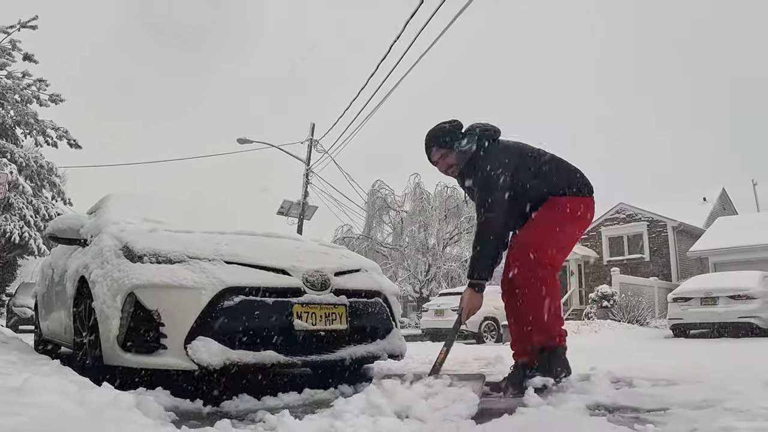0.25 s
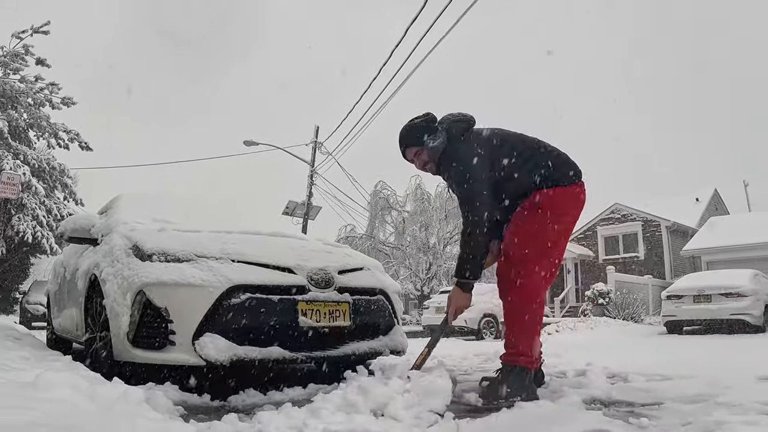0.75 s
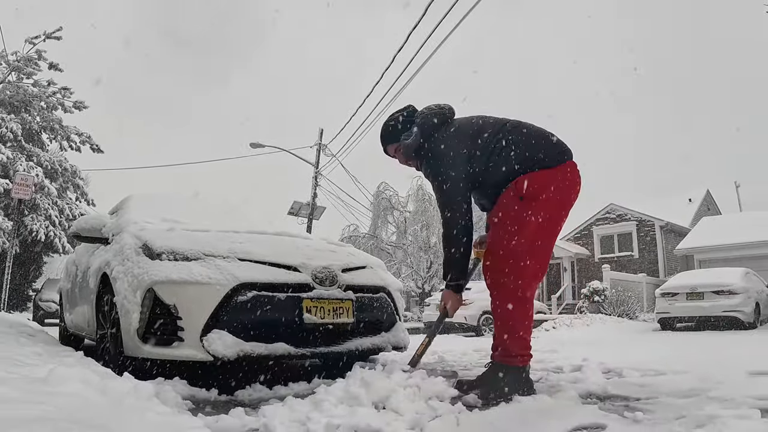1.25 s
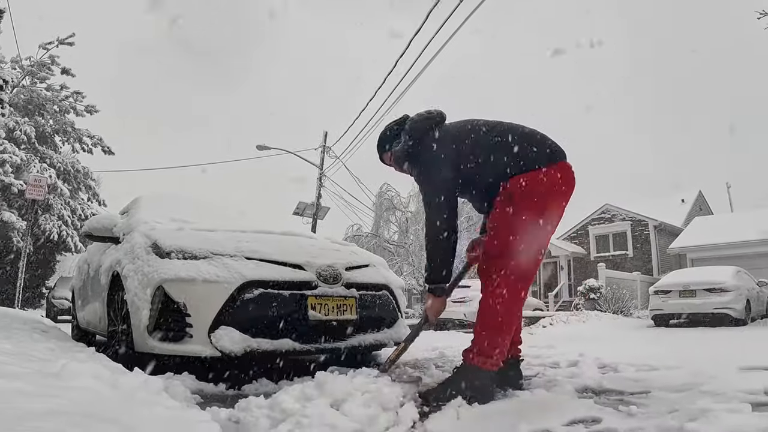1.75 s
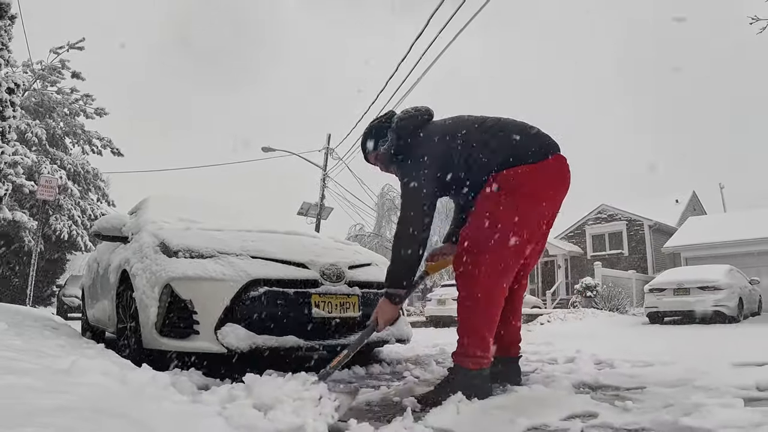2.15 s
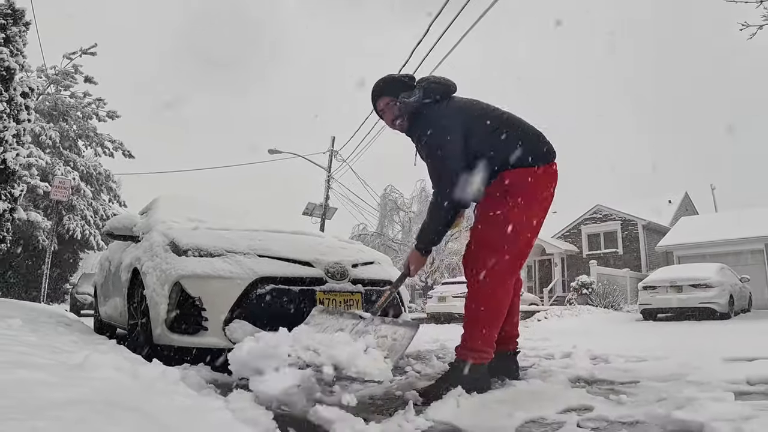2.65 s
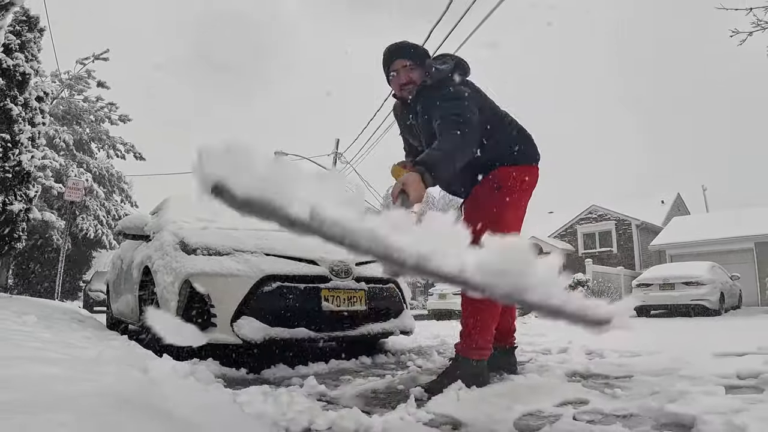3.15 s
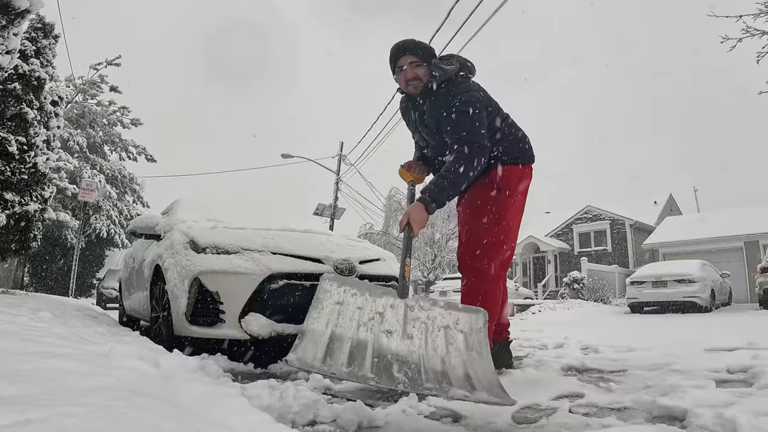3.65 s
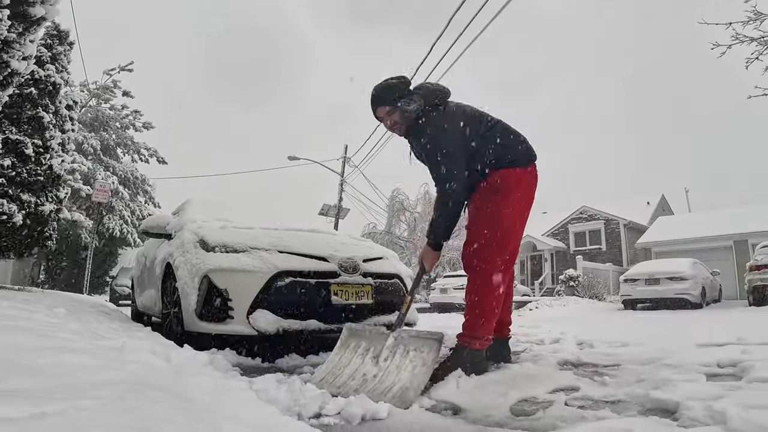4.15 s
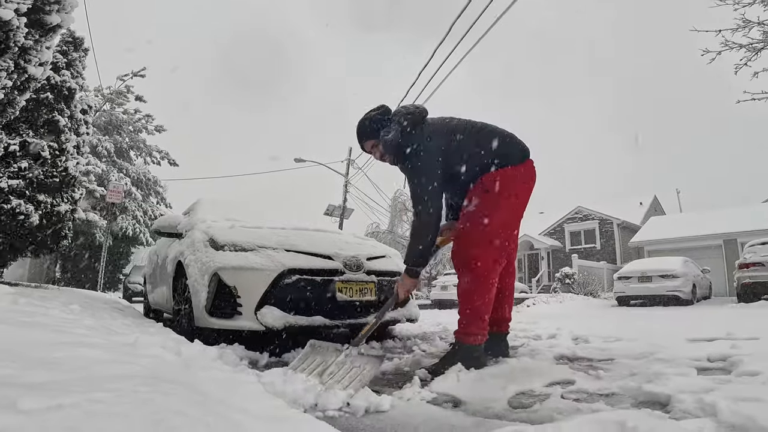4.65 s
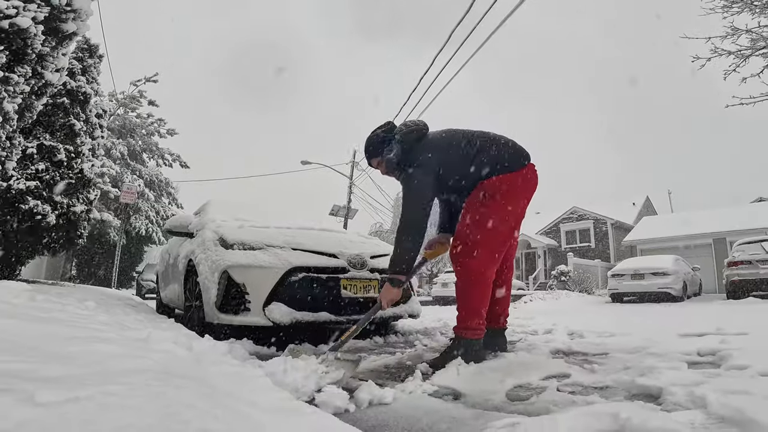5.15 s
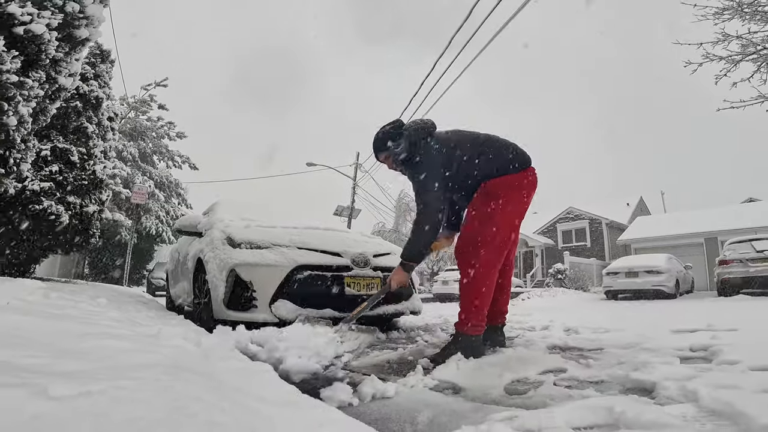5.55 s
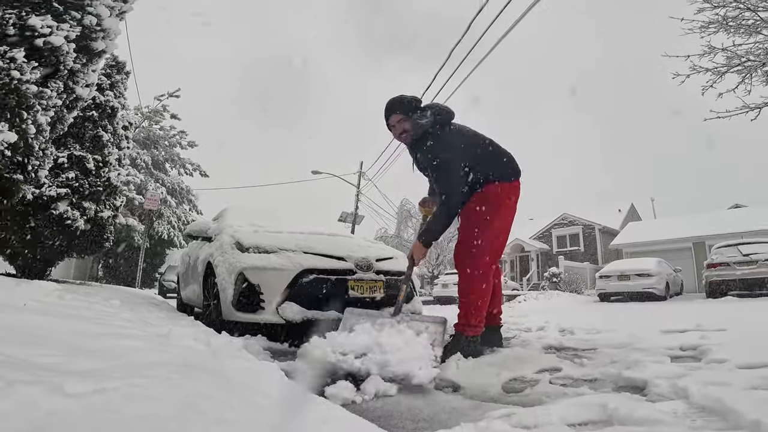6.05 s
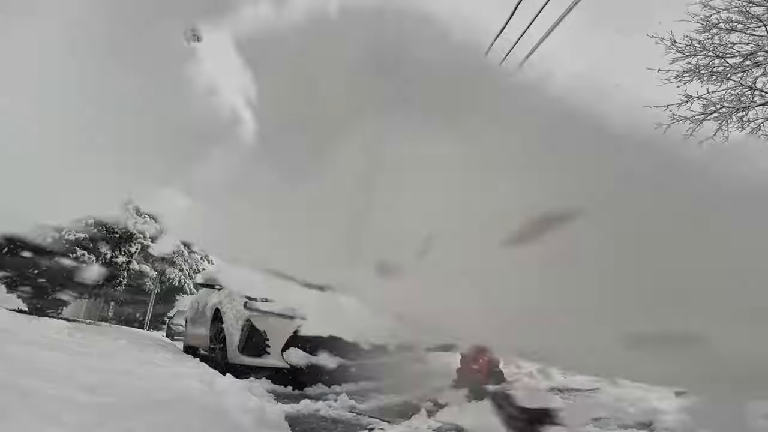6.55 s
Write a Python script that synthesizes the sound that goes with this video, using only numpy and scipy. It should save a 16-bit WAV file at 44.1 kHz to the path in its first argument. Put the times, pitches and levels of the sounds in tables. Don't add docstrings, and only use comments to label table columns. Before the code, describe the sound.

Outdoor stereo microphone a few steps from a snow shovel. Hollow, low-mid scraping stutters with grit clicks and dull knocks, in irregular bursts separated by light drags and near-quiet. Airy snow hisses swell and cut off after the loaded push; a later icy scrape is the loudest and crispest. Distant low traffic and a muffled tyre hiss lie underneath. Snow lands on the microphone at the end, thudding and crackling.

```python
import sys
import numpy as np
from scipy import signal
from scipy.fft import rfft, irfft, next_fast_len
from scipy.io import wavfile
from scipy.ndimage import uniform_filter1d, map_coordinates

SR = 44100
rng = np.random.default_rng(int(sys.argv[2]) if len(sys.argv) > 2 else 0)


def store_pcm(level_fs):
    pcm = np.round(np.clip(level_fs, -1, 1) * 32767).astype(np.int16)
    wavfile.write(sys.argv[1], SR, np.atleast_2d(pcm).T)


def natural_amplitude(level_db):
    exponent = np.asarray(level_db, float) / 20
    return 10 ** exponent


N = 299880


def unit(x):
    return x / np.sqrt(np.mean(x ** 2) + 1e-20)


def even(gate):
    return gate / np.sqrt(np.abs(uniform_filter1d(gate ** 2, size=3000)) + 1e-9)


def along(points, hz):
    f, value = np.transpose(points)
    return np.interp(np.log(hz + 1), np.log(f + 1), value)


def curves(rows):
    s, *columns = np.transpose(rows)
    return [np.interp(np.arange(N) / SR, s, column) for column in columns]


def wobble(rate):
    knots = rng.standard_normal(int(N * rate / SR) + 4)
    return map_coordinates(knots, [np.arange(N) * rate / SR])


def filtered(x, response):
    m = next_fast_len(x.shape[-1] + 8192)
    return irfft(rfft(x, m) * response(np.fft.rfftfreq(m, 1 / SR)), m)[..., :x.shape[-1]]


def modes(table):
    def response(f):
        total = 0
        for k, (centre, width, db) in enumerate(table):
            resonance = 1j * f * width / (centre * centre - f * f + 1j * f * width)
            total = total + (-1) ** k * natural_amplitude(db) * resonance
        return total
    return response


def spread(pair, alike):
    def mid_side(hz):
        turn = np.arccos(np.clip(along(alike, hz), -1, 1)) / 2
        return np.array([np.cos(turn), np.sin(turn)])
    mid, side = filtered(pair, mid_side)
    return np.array([mid + side, mid - side])


def panned(pair, lr_db):
    return pair * natural_amplitude([[lr_db / 2], [-lr_db / 2]])


def rush(spectrum, grain=1, patchy_db=1):
    z = signal.stft(grain * rng.standard_normal((2, N)), nperseg=256)[2]
    field = uniform_filter1d(rng.standard_normal(z.shape[1:]), size=7, axis=0)
    field = uniform_filter1d(field, size=5, axis=1)
    pair = signal.istft(z * natural_amplitude(patchy_db * unit(field)), nperseg=256)[1][:, :N]
    return unit(filtered(pair, lambda hz: natural_amplitude(along(spectrum + [(20000, -120)], hz))))


def slips(rate, scatter_db, life_s):
    scatter = np.clip(rng.standard_normal(N), -2, 2)
    starts = (rng.random(N) < rate / SR) * natural_amplitude(scatter_db * scatter)
    slow, fast = np.exp(-1 / (life_s * SR)), np.exp(-3 / (life_s * SR))
    return unit(signal.lfilter([1], np.convolve([1, -slow], [1, -fast]), starts))


# (frequency [Hz], width [Hz], level [dB])
BLADE_MODES = [(121, 27, -11.5), (180, 22, -5), (296, 62.5, -4), (388, 119, 1.5), (418, 172, -3)]
# (frequency [Hz], width [Hz], level [dB])
RIB_MODES = [(532, 148, 4), (792, 218, 5.5), (870, 197, 5), (1510, 700, -7)]
# (frequency [Hz], density [dB per Hz])
SLUSH_SPECTRUM = [(400, -42), (700, -8), (1100, 3.5), (1600, 2.5), (3200, 4.5), (5000, -4), (7500, -12.5),
                  (11000, -50)]
# (frequency [Hz], density [dB per Hz])
POWDER_SPECTRUM = [(2500, -20), (4500, -4.5), (7500, -7.5), (10000, -9), (12500, -15.5), (15000, -14)]
# (frequency [Hz], left-right likeness [0..1])
NEAR = [(30, .95), (130, .97), (500, .975), (1500, .97), (3000, .95), (6000, .9), (10000, .78), (13500, .2)]


def shovel():
    shake_db, ribs_db, slush_db, powder_db = motion()
    contact = np.clip((shake_db - slush_db) / 12, 0, 1) * np.clip((shake_db + 56) / 12, .15, 1)
    grit = slips(rate=320, scatter_db=5, life_s=.0022)
    fine_grit = slips(rate=600, scatter_db=4, life_s=.001)
    grain = even(1 + contact * grit + .15 * fine_grit)
    grain = grain * even(natural_amplitude(2.2 * contact * wobble(55)))

    force = even(1.2 + grit) * rng.standard_normal((2, N))
    bending = unit(filtered(force, lambda f: modes(BLADE_MODES)(f) / (1 + (f / 600) ** 4)))
    ribs = unit(filtered(force, lambda f: modes(RIB_MODES)(f) / (1 + (400 / (f + 1)) ** 4)))
    slush = natural_amplitude(slush_db + 1.5) * rush(SLUSH_SPECTRUM, grain, patchy_db=2.8)
    powder = natural_amplitude(powder_db) * rush(POWDER_SPECTRUM, grain, patchy_db=1.5)
    body = natural_amplitude(shake_db) * bending + natural_amplitude(ribs_db) * ribs + slush + powder
    return spread(body, NEAR) + natural_amplitude(slush_db - 2) * contact * grit_rings()


def swell(peak_s, rise_s, fall_s, db):
    u = np.arange(N) / SR - peak_s
    roundness = np.where(u < 0, 1.8, 2.4)
    return db - 20 * (np.abs(u) / np.where(u < 0, rise_s, fall_s)) ** roundness


# (time [s], pressure [dB], speed [dB])
STROKES = [
    [(0.0, -51, -63), (0.05, -58, -65), (0.1, -42, -58.5), (0.16, -39.5, -52), (0.25, -47, -50.5),
     (0.36, -42, -56), (0.42, -51, -57.5), (0.52, -54.5, -76.5), (0.58, -61, -69)],
    [(0.58, -57, -69.5), (0.64, -53.5, -61.5), (0.74, -44.5, -56.5), (0.8, -52.5, -57), (0.83, -56, -60.5),
     (0.865, -38.5, -90), (0.9, -66, -64), (0.94, -51, -73), (0.98, -79, -94)],
    [(1.88, -101, -70.5), (1.94, -58, -58.5), (1.99, -44.5, -59), (2.06, -40.5, -52.5),
     (2.15, -35.5, -51.5), (2.26, -41, -56.5), (2.33, -42.5, -57), (2.35, -50, -70), (2.38, -62, -75)],
]
# (time [s], pressure [dB], speed [dB])
LATER_STROKES = [
    [(4.46, -91, -76), (4.497, -66, -54), (4.51, -47.5, -50.5), (4.58, -45, -49), (4.64, -42, -54.5),
     (4.69, -37.5, -48), (4.76, -46, -53), (4.825, -34.5, -46), (4.845, -41, -55)],
    [(4.845, -43, -70), (4.92, -51, -59), (4.97, -48.5, -65.5), (5.01, -51.5, -67), (5.09, -54, -63),
     (5.18, -51, -69), (5.2, -47.5, -73), (5.27, -86, -73.5)],
    [(6.64, -70, -67), (6.68, -61, -73), (6.71, -42, -47.5), (6.73, -75, -55), (6.76, -51, -57.5),
     (6.78, -65, -76), (6.8, -47, -51.5)],
]
DRY_DB = [-13.5, -9.5, -8.5, -5.5, -3.5, 4.5]
RIB_DB = [3.5, 3.7, 1.8, 4.9, 2.6, 2.9]
# (peak [s], rise [s], fall [s], hiss [dB], powder over slush [dB])
DRAGS = [
    (1.3, 0.078, 0.17, -69, -8),
    (1.76, 0.083, 0.2, -65.5, -3),
    (2.47, 0.056, 0.2, -64.5, -5),
    (2.97, 0.22, 0.13, -72.5, 0),
    (3.7, 0.36, 0.25, -77, -3),
    (6.46, 0.06, 0.14, -66.5, 2.5),
]
# (peak [s], rise [s], fall [s], hiss [dB], powder over slush [dB])
THROWS = [(0.14, 0.17, 0.11, -70, 6.5), (0.82, 0.041, 0.058, -59, -4), (0.95, 0.15, 0.2, -71.5, -2),
          (2.62, 0.23, 0.24, -65.5, -1.5), (3.17, 0.14, 0.05, -50, 2.5), (3.35, 0.098, 0.049, -48, 2),
          (3.59, 0.21, 0.089, -75, -5), (4.46, 0.25, 0.22, -67, 1), (3.41, .04, 0.079, -80, 7),
          (4.22, .03, 0.037, -76, 4.5), (4.275, .02, 0.038, -73, 4.5), (5.6, 0.11, 0.097, -79, -0.5),
          (6.27, 0.07, 0.41, -78, 10.5), (6.6, 0.25, 0.3, -65, 3.5), (6.49, 0.075, 0.18, -55, -14),
          (1.355, 0.038, 0.032, -68.5, 3.5), (1.63, 0.26, 0.32, -83.5, 10), (3.27, 0.12, 0.15, -52.5, -2),
          (6.732, 0.029, 0.036, -55, 12), (6.8, 0.03, .1, -58, 10.5)]


def motion():
    t, parts = np.arange(N) / SR, []
    for rows, dry_db, rib_db in zip(STROKES + LATER_STROKES, DRY_DB, RIB_DB):
        off_db = np.where((t >= rows[0][0]) & (t < rows[-1][0]), 0, -200)
        press, speed = np.array(curves(rows)) + off_db
        ribs = rib_db + 0.91 * speed + (1 - 0.91) * press
        parts.append([press, ribs, speed, speed + dry_db])
    for table, shake_db, rib_db in [(DRAGS, 4, -8.5), (THROWS, -18.5, -17)]:
        for peak_s, rise_s, fall_s, db, dry_db in table:
            offsets = np.array([[shake_db], [rib_db], [0], [dry_db]])
            parts.append(swell(peak_s, rise_s, fall_s, db) + offsets)
    power = sum(natural_amplitude(np.array(part, np.float32)) ** 2 for part in parts)
    return 10 * np.log10(power + 1e-11)


def grit_rings():
    count = int(260 * N / SR)
    u, g = rng.random((count, 3)), rng.standard_normal(count)
    hz = np.clip(1900 * np.exp(.75 * g), 450, 9000)[:, None]
    t = np.arange(600) / SR
    decay = natural_amplitude(-5 * np.log(u[:, 1:2] + .01) - 30 * t * hz / 7)
    ring = decay * np.sin(2 * np.pi * hz * t) * (1 - np.exp(-t * hz))
    at = (u[:, :1] * N).astype(int) + np.arange(len(t))
    return unit(np.bincount(at.ravel(), ring.ravel())[:N])


def knocks(table, low, lead):
    out, t = np.zeros(N + SR), np.arange(SR // 8) / SR
    for s, db, hz, t60 in table:
        ring = np.sin(2 * np.pi * hz * t) + low * np.sin(2 * np.pi * 0.625 * hz * t)
        ring = ring * natural_amplitude(-60 * t / t60) * (1 - np.exp(-(t * hz) ** 3))
        ring = ring + lead * np.sin(2 * np.pi * 1050 * t) * natural_amplitude(-50 * t / t60)
        out[round((s + .0012) * SR):][:len(t)] += natural_amplitude(db - 1.0) * ring / np.abs(ring).max()
    return out[:N]


# (time [s], peak [dB], frequency [Hz], t60 [s])
KNOCKS = [(0.117, -26, 430, 0.0069), (0.131, -24, 340, 0.016), (0.159, -18, 370, 0.01),
          (0.17, -33, 160, 0.098), (0.201, -26, 373, 0.014), (0.23, -31.5, 183, 0.18),
          (0.21, -23, 388, 0.016), (0.304, -27.5, 437, 0.073), (0.36, -29, 298, 0.016),
          (0.617, -34.5, 370, 0.016), (0.645, -35.5, 332, 0.022), (0.713, -32.5, 597, 0.084),
          (0.836, -29, 667, 0.016), (0.839, -40, 320, 0.018), (0.856, -28, 443, 0.0093),
          (0.879, -41, 272, 0.023), (2.069, -27.5, 374, 0.018), (2.229, -25.5, 327, 0.046),
          (2.24, -45, 193, 0.07), (2.253, -35, 294, 0.04), (2.27, -34, 296, 0.03),
          (2.299, -28.5, 309, 0.067), (4.573, -26.5, 340, 0.05), (4.591, -25.5, 330, 0.02),
          (4.633, -27, 380, 0.015), (4.661, -24.5, 357, 0.019), (4.679, -27.5, 353, 0.05),
          (4.699, -26.5, 370, 0.032), (4.833, -34, 332, 0.022), (4.851, -33, 250, 0.025),
          (4.932, -31.5, 523, 0.044), (5.087, -32, 326, 0.026), (5.162, -21, 542, 0.012),
          (6.636, -35.5, 554, 0.0085)]
# (time [s], peak [dB], frequency [Hz], t60 [s])
SHUDDERS = [(0.088, -43, 348, 0.027), (0.191, -35, 355, 0.033), (0.223, -29.5, 427, 0.054),
            (0.249, -31.5, 470, 0.037), (0.265, -33, 267, 0.033), (0.334, -42, 315, 0.033),
            (0.389, -44, 336, 0.028), (1.938, -39, 406, 0.019), (1.966, -37, 380, 0.028),
            (1.984, -34, 286, 0.03), (2.009, -39, 246, 0.026), (2.052, -30, 398, 0.037),
            (2.076, -29, 402, 0.056), (2.091, -27.5, 351, 0.054), (2.116, -39, 339, 0.019),
            (2.129, -28.5, 296, 0.048), (2.149, -35, 423, 0.05), (2.162, -24.5, 394, 0.032),
            (2.175, -37, 403, 0.038), (2.194, -32, 310, 0.038), (2.208, -28, 313, 0.025),
            (2.314, -40, 280, 0.03), (2.334, -43, 293, 0.022), (4.538, -32.5, 370, 0.03),
            (4.738, -34, 384, 0.03), (4.78, -38, 277, 0.03), (4.799, -39, 444, 0.028),
            (4.886, -40, 291, 0.02), (5.034, -42, 336, 0.031), (5.059, -39, 360, 0.037)]
# (time [s], peak [dB], frequency [Hz], t60 [s])
RIB_HITS = [(0.62, -42, 595, 0.025), (0.668, -45, 1010, 0.03), (0.704, -40, 637, 0.032),
            (0.752, -35, 580, 0.03), (0.766, -40, 560, 0.034), (0.789, -47, 546, 0.03),
            (0.849, -33, 494, 0.036), (1.939, -56, 635, 0.035), (1.981, -40.5, 600, 0.028),
            (2.025, -35, 516, 0.025), (2.067, -25, 504, 0.013), (2.111, -34, 560, 0.058),
            (2.148, -30.5, 696, 0.068), (2.169, -41, 514, 0.024), (2.203, -36.5, 610, 0.03),
            (2.229, -32, 635, 0.03), (2.255, -33.5, 662, 0.046), (2.295, -39, 517, 0.034),
            (4.536, -32, 870, 0.053), (4.559, -43, 790, 0.037), (4.588, -35, 870, 0.057),
            (4.644, -33.5, 604, 0.042), (4.71, -44, 550, 0.043), (4.911, -38, 473, 0.025),
            (5.006, -49, 500, 0.033), (5.073, -40, 560, .03), (5.092, -43, 620, 0.031),
            (5.125, -49, 503, .03), (5.168, -30.5, 395, 0.017)]


def blows():
    hard = knocks(KNOCKS, low=0.67, lead=0.025)
    return hard + knocks(SHUDDERS, low=0.14, lead=0) + knocks(RIB_HITS, low=0, lead=0)


# (time [s], peak [dB], frequency [Hz])
JOLTS = [
    (0.84, -23, 318),
    (2.255, -21, 280),
    (2.271, -21.5, 285),
    (4.834, -18, 310),
]


def jolts():
    t, out = np.arange(N) / SR, 0
    for s, db, hz in JOLTS:
        envelope = np.exp(-((t - s) * hz / .5) ** 2)
        out = out + natural_amplitude(db + 0.5) * np.sin(2 * np.pi * hz * (t - s)) * envelope
    return out


def cracks(table, width, rise_s):
    out, t = np.zeros((2, N + SR)), np.arange(SR // 8) / SR
    for s, db, treble_db, hz, t60, lr_db in table:
        puff = rng.standard_normal((2, len(t))) * natural_amplitude(-60 * t / t60) * (1 - np.exp(-t / rise_s))
        pitch = modes([(hz, width * hz, 0)])
        treble = modes([(7000, 6000, (treble_db + 3) / 2)])
        crack = spread(filtered(puff, lambda f: pitch(f) ** 2 + treble(f) ** 2), NEAR)
        out[:, round((s + .0002) * SR):][:, :len(t)] += panned(natural_amplitude(db) * crack / np.abs(crack).max(), lr_db)
    return out[:, :N]


# (time [s], peak [dB], centre [Hz], treble [dB])
CATCHES = [(0.116, -38, 1160, -32), (0.1271, -26.5, 2400, -26), (0.158, -26.5, 1540, -38),
           (0.1888, -41, 1480, -28), (0.2093, -35, 1540, -34), (0.2892, -44, 2850, -29),
           (0.836, -33.5, 1180, -51), (0.852, -42, 1790, -19), (0.879, -44, 1290, -42),
           (0.9264, -47.5, 2320, -43), (2.021, -34.5, 1730, -26), (2.0283, -30.5, 3080, -47),
           (2.07, -36, 1460, -43), (2.15, -35.5, 2620, -34), (2.163, -41, 2390, -31),
           (2.203, -51, 2600, -26), (2.228, -43, 2780, -26), (2.2458, -34.5, 3080, -42),
           (2.2664, -40, 1850, -28), (2.313, -40, 7200, 7), (2.3234, -36, 3320, -30),
           (5.1625, -29.5, 990, -48)]
# (time [s], peak [dB], centre [Hz], treble [dB])
ICY_CATCHES = [(4.502, -31.5, 2060, -30), (4.507, -40, 6000, -6), (4.513, -27, 2380, -38),
               (4.538, -32, 1400, -34), (4.571, -23.5, 1300, -24), (4.594, -27, 1230, -20),
               (4.6307, -31, 1370, -32), (4.66, -32, 1500, -15), (4.68, -29.5, 1330, -13.5),
               (4.693, -36, 2360, -19), (4.778, -46, 2570, -14), (4.811, -34.5, 1420, -23),
               (4.8325, -38.5, 1310, -17), (4.886, -62, 9000, -10), (4.929, -35.5, 2300, -27)]
# (time [s], peak [dB], centre [Hz], treble [dB])
GRIT_CATCHES = [(0.2452, -43, 1620, -25), (0.306, -45, 3110, -30), (0.3616, -53, 1390, -30),
                (0.384, -49, 2270, -30), (0.4094, -47, 1890, -25), (0.6212, -44.5, 1210, -36),
                (0.667, -45, 1520, -30), (0.7013, -41, 1540, -32), (0.7194, -46, 1490, -30),
                (0.751, -52, 1310, -36), (0.81, -50, 1880, -30), (2.0068, -44, 1770, -36),
                (2.0774, -32, 1640, -36), (2.09, -42, 1510, -30), (2.1281, -40, 1660, -35),
                (2.211, -48, 2690, -32), (2.277, -40, 2670, -30), (2.2974, -49, 1330, -23),
                (4.551, -23, 1450, -37), (4.5588, -28, 1510, -39), (4.6196, -27.5, 1370, -30),
                (4.7158, -43, 2280, -30), (4.7336, -42, 2090, -28), (4.8252, -39, 1460, -30)]
# (time [s], peak [dB], centre [Hz], left-right [dB])
LUMPS = [
    (6.635, -40, 3300, 1),
    (6.6862, -38.5, 3700, 6),
    (6.7036, -30.5, 2180, -11),
    (6.7216, -32, 5900, -2),
    (6.7944, -42, 3660, 10),
]
# (time [s], peak [dB], centre [Hz], left-right [dB])
TICKS = [(1.1596, -63, 5890, 13), (1.246, -51.5, 5160, -1), (2.031, -59, 5230, -2), (2.4409, -58, 3580, -5),
         (2.828, -56, 6400, 11), (2.969, -50.5, 4360, .5), (3.011, -50, 5200, 1), (3.562, -58, 5490, -2),
         (3.571, -55, 9470, 7), (3.577, -53, 3600, 12), (3.612, -50, 8000, 24), (3.629, -57, 7840, 12),
         (3.6286, -52, 3700, 10), (5.313, -58, 5300, -1), (3.572, -52, 2100, 3), (5.118, -51, 2500, 0),
         (5.04, -54, 10000, 12), (5.72, -57.5, 7400, 5), (5.733, -58, 10000, 20), (6.3444, -53, 7160, -2),
         (6.706, -42, 11000, -4),
         (0.9787, -55, 4810, 1.0), (1.3264, -52, 4770, 0.0), (1.8028, -52, 5150, 0.5),
          (3.5105, -67, 5670, 0.5), (3.7044, -59, 4000, 8), (3.7214, -65, 7890, 6),
          (3.7364, -58, 11800, 10), (3.765, -63, 4010, 5), (3.8774, -77, 4680, 3.5),
          (3.9086, -67, 5270, 11), (4.0582, -66, 4130, 12), (4.0872, -66, 5470, 7),
          (4.2019, -61, 6270, 0.5), (4.265, -52, 4440, 2), (4.3376, -54, 5260, 0.5),
          (5.2111, -55, 4400, 0.5)]


def crackle():
    edge = []
    for rows, t60 in [(CATCHES, .04), (ICY_CATCHES, .037), (GRIT_CATCHES, .021)]:
        edge += [(s, db, treble_db, hz, t60, -0.5) for s, db, hz, treble_db in rows]
    lumps = [(s, db, -10, hz, .012, lr_db) for s, db, hz, lr_db in LUMPS]
    ticks = [(s, db, -9.5, hz, .012, lr_db) for s, db, hz, lr_db in TICKS]
    return cracks(edge + lumps, width=1.31, rise_s=.002) + cracks(ticks, width=0.43, rise_s=.00056)


# (time [s], peak [dB], centre [Hz], t60 [s])
PUFFS = [
    (3.632, -56, 12200, 0.19),
    (5.283, -58.5, 7500, .03),
    (5.35, -54, 7750, 0.016),
    (5.354, -53, 3880, .04),
    (5.55, -64, 6500, .12),
    (6.035, -64, 10500, 0.12),
    (6.298, -54, 4530, 0.076),
    (6.335, -55, 8000, .05),
    (6.365, -68, 5000, .05),
]
# (time [s], peak [dB], treble [dB], centre [Hz], t60 [s], left-right [dB])
SNAPS = [
    (3.5787, -39, -18, 9200, .005, 22),
    (4.9322, -33, -8, 3200, .035, 0),
    (5.1632, -39, -16, 4000, .008, 0),
]


def crumbs():
    soft = [(s, db, -25, hz, t60, 2.5) for s, db, hz, t60 in PUFFS]
    return cracks(soft, width=.45, rise_s=.002) + cracks(SNAPS, width=.7, rise_s=.00015)


# (time [s], level [dB], frequency [Hz], t60 [s]); minus Hz pushes inward first
THUMP = [
    (6.7062, -26, -40, 0.11),
    (6.7083, -18, -2700, 0.0045),
    (6.7015, -33, 700, 0.012),
    (6.7195, -25.5, 90, 0.03),
]


def thump():
    t, out = np.arange(N) / SR, 0
    for s, db, hz, t60 in THUMP:
        u = np.maximum(t - s, 0)
        out = out + natural_amplitude(db) * np.sin(2 * np.pi * hz * u) * natural_amplitude(-60 * u / t60)
    return out * natural_amplitude([[-3.5], [3]])


# (time [s], traffic [dB], car [dB])
STREET = [(0, -50, -77), (0.5, -48.5, -75), (1.1, -50.5, -73.5), (1.6, -50, -74.5), (2.8, -52, -72.5),
          (3.6, -49.5, -73), (4.1, -46.5, -73), (4.4, -45.5, -72.5), (5.35, -49, -70.5), (5.7, -49, -65),
          (6.5, -47, -67), (6.8, -40, -61)]
# (frequency [Hz], density [dB per Hz])
RUMBLE_SPECTRUM = [(15, -27), (28, -4), (50, -2), (95, -4.5), (130, -11.5), (180, -25)]
# (frequency [Hz], density [dB per Hz])
ENGINE_SPECTRUM = [(90, -37), (140, -2.5), (200, -8.5), (270, -14.5), (380, -33), (500, -67), (600, -43),
                   (850, -40), (1200, -75)]
# (frequency [Hz], density [dB per Hz])
TYRE_SPECTRUM = [(700, -17.5), (820, -15), (950, -3.5), (1300, -0.5), (1800, -4.5), (4000, -14.5),
                 (9500, -26.5), (15000, -26.5)]
# (frequency [Hz], left-right likeness [0..1])
FAR = [(30, .82), (70, .985), (130, .94), (200, .95), (400, .96), (700, .7), (1500, .65), (3000, .5),
       (6000, .58), (13000, .15)]


def street():
    rumble_db, tyres_db = curves(STREET)
    engines_db = 6 + 0.7 * tyres_db + (1 - 0.7) * rumble_db
    rumble = natural_amplitude(rumble_db + 0.23 * wobble(6)) * rush(RUMBLE_SPECTRUM)
    engines = natural_amplitude(engines_db + 0.21 * wobble(7)) * rush(ENGINE_SPECTRUM)
    tyres = natural_amplitude(tyres_db + 1.5 + .6 * wobble(4)) * rush(TYRE_SPECTRUM, patchy_db=.7)
    return spread(rumble + engines, FAR) + panned(spread(tyres, FAR), 3.5)


def scene():
    return shovel() + blows() + jolts() + crackle() + crumbs() + thump() + street()


def band_limit(x):
    return signal.sosfilt(signal.butter(12, 15690, fs=SR, output="sos"), x)


# (frequency [Hz], left-right [dB])
PORTS = [(150, 0), (350, -1.5), (750, -3), (1500, -2), (3000, -1), (6000, -.5), (10000, 1.5), (13500, 4.5)]
# (frequency [Hz], lead of the left [rad])
LEAD = [(300, 0), (1400, -.15), (3000, -.55), (6000, -.4), (10000, -.1)]
# (frequency [Hz], level [dB])
CAPSULE = [(8000, -2), (12000, -6.5), (14500, -17), (15500, -29), (16000, -60)]


def record(dry):
    half = np.array([[.5], [-.5]])

    def response(hz):
        level_db = half * along(PORTS, hz) + along(CAPSULE, hz)
        return natural_amplitude(level_db) * np.exp(1j * half * along(LEAD, hz))
    return band_limit(filtered(dry, response))


dry = scene()
out = record(dry)
store_pcm(out)
```